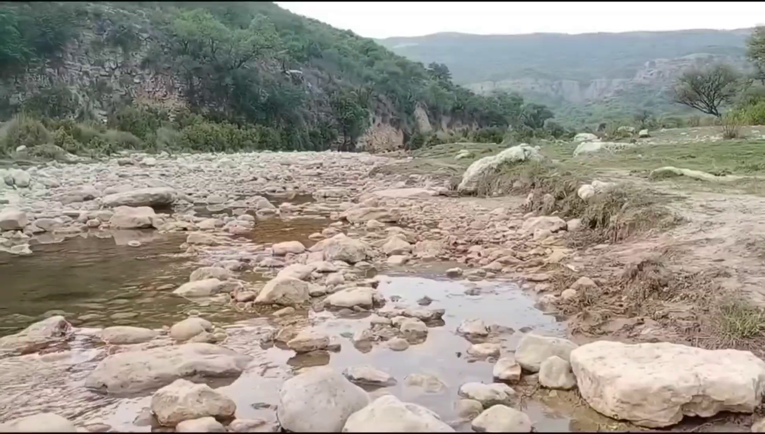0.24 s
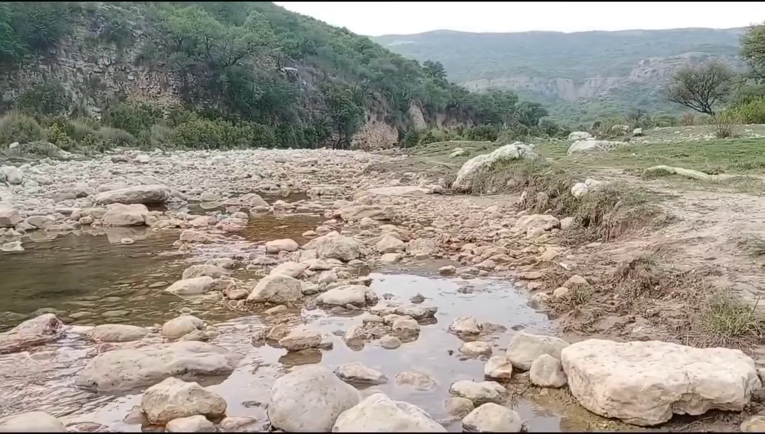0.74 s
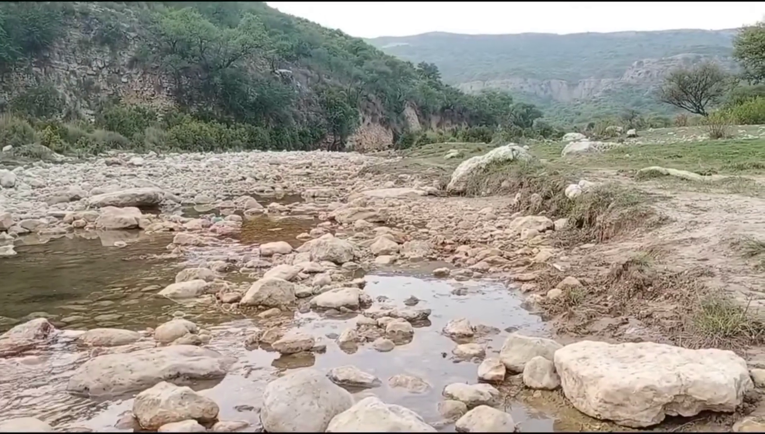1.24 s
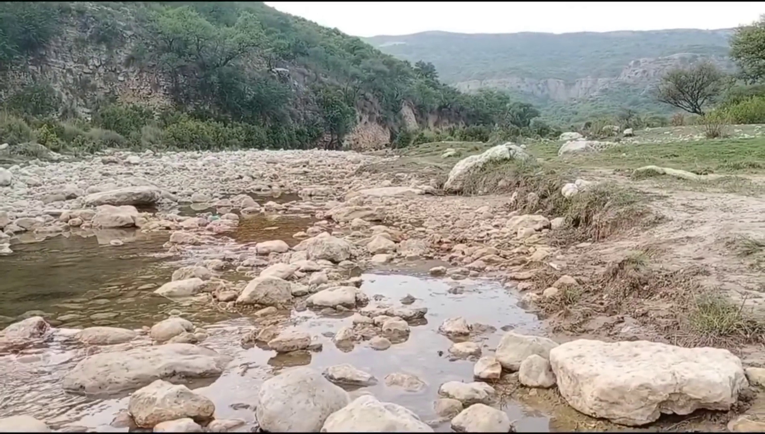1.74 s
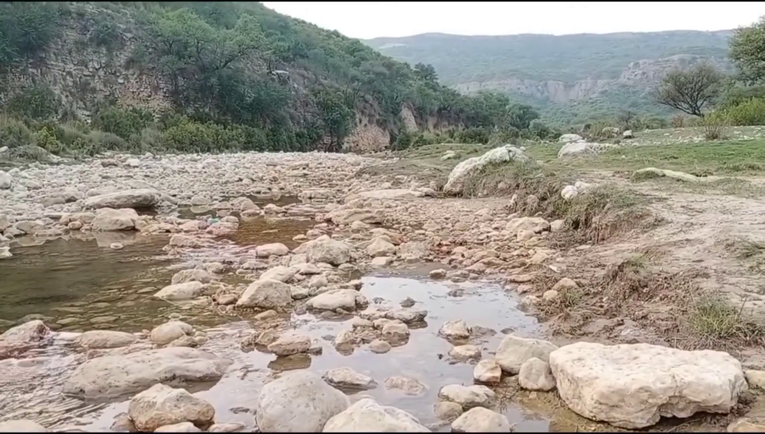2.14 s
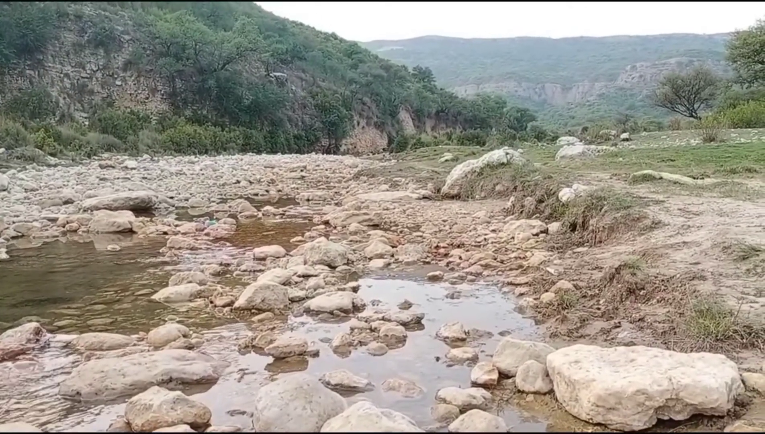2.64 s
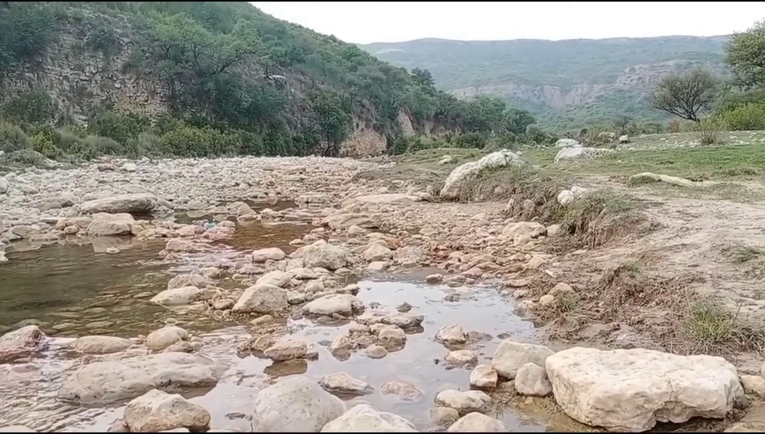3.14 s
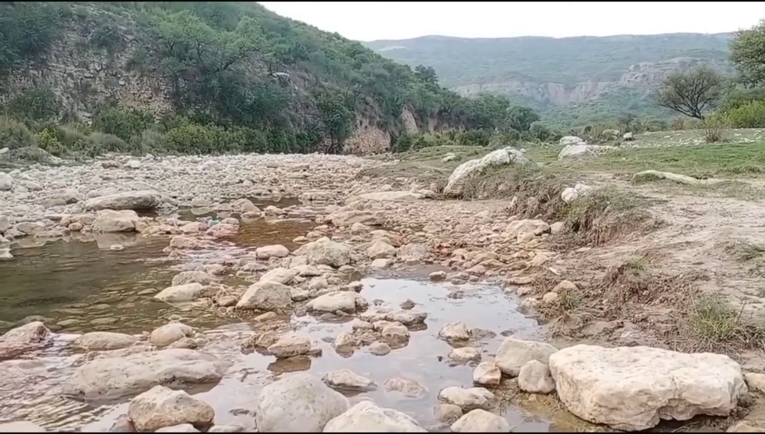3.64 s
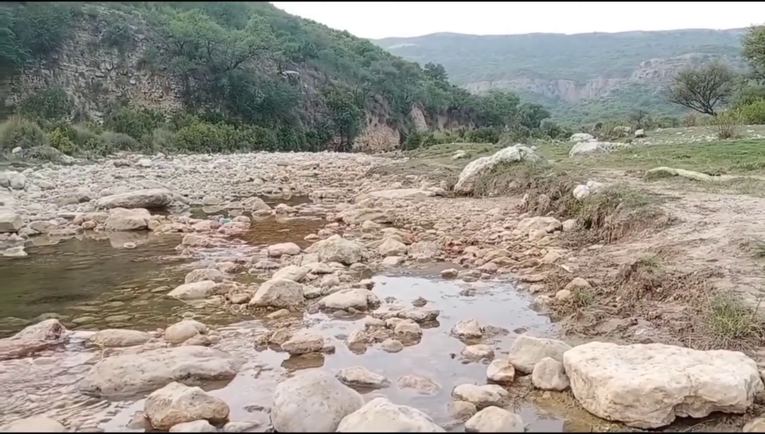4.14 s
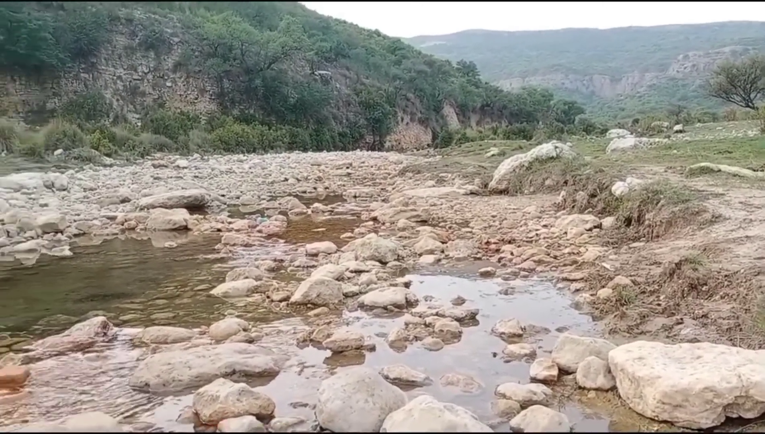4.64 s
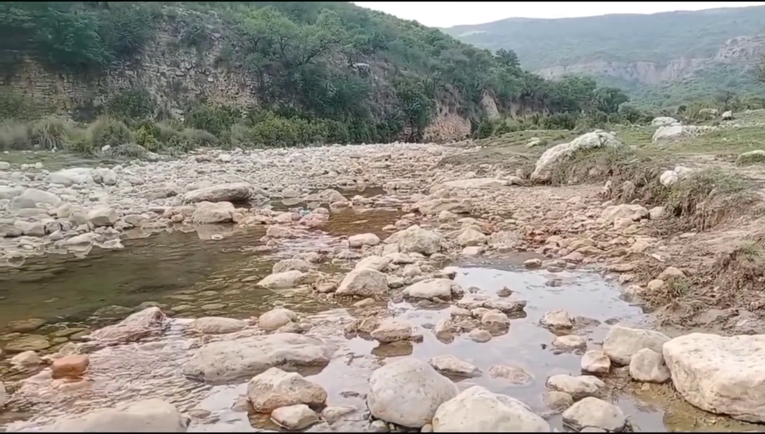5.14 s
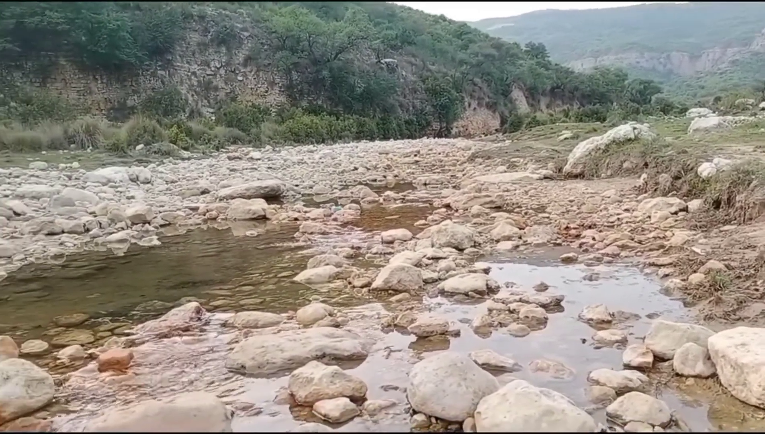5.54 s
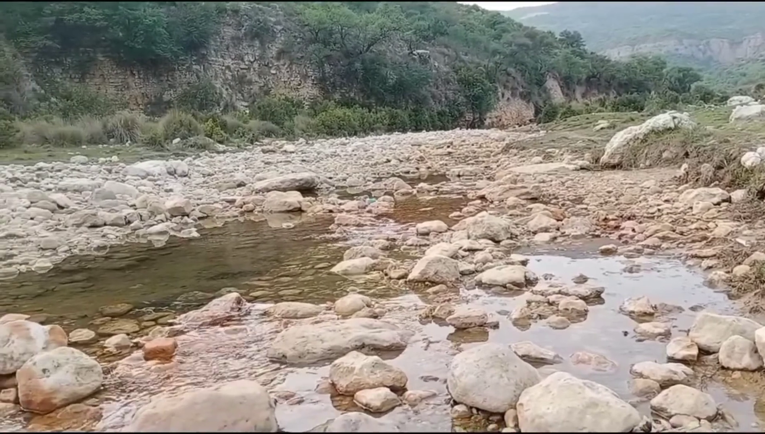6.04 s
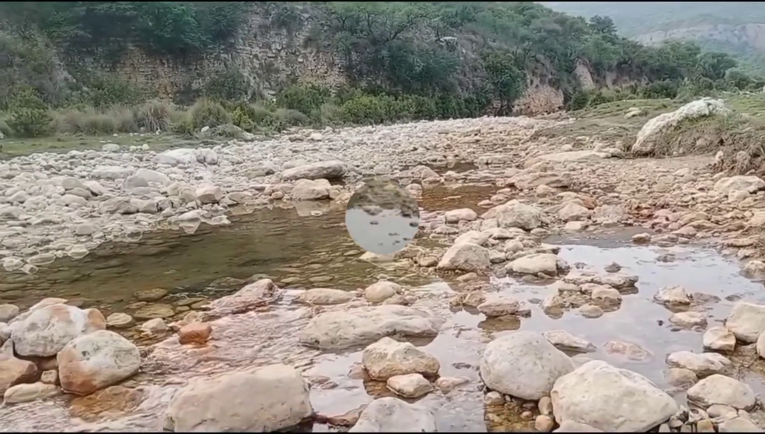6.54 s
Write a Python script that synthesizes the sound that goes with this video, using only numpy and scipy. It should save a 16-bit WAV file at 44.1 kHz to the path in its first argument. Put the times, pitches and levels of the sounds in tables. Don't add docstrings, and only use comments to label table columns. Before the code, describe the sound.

Quiet water bubbles and splashes among rocks while feet shift on gravel and birds chirp; at the end soft wind, hiss and engine puffs fade in.

```python
import sys
import numpy as np
from scipy import signal
from scipy.fft import rfft, irfft, next_fast_len
from scipy.io import wavfile
from scipy.ndimage import uniform_filter1d, map_coordinates

SR = 44100
rng = np.random.default_rng(int(sys.argv[2]) if len(sys.argv) > 2 else 0)


def pcm_store(signal):
    levels = np.round(np.clip(np.atleast_2d(signal), -1, 1) * 32767)
    wavfile.write(sys.argv[1], SR, levels.astype(np.int16).T)


def voltage_ratio(level):
    return 10 ** (np.asarray(level, float) / 20)


N = 298998
T = np.arange(N) / SR
CUT_S, TOP_HZ = 0.305, 15750

# time in seconds, level in dB.
CALM_FLOW = [(0, -51.5), (.087, -55), (.304, -50.5), (.307, -85), (.42, -67.5), (1.2, -59.5), (2.3, -56.5),
             (2.53, -68), (2.85, -64), (3.25, -68), (3.9, -63), (4.34, -65.5), (5.3, -63), (6.4, -56.5),
             (6.51, -65), (6.78, -51)]
# time in seconds, level in dB.
VALLEY_RUMBLE = [(0.0, -76.5), (0.136, -67), (0.304, -72.5), (0.307, -81), (1.23, -77.5), (5.28, -79),
                 (6.3, -73), (6.78, -64)]
# crest in seconds, seconds to fall 10 dB, crest in dB, fizz over it in dB.
SURGES = [(0.54, -0.05, -57, -4.5), (.91, 0.7, -61, -27), (1.2, 0.5, -67, -4), (1.4, 0.15, -58.5, -12),
          (1.591, 0.0738, -48.5, -7.5), (1.912, 0.13, -52, -3), (2.078, 0.11, -52, -2),
          (2.234, 0.08, -63, 6.5), (2.41, 0.09, -57, -7.5), (2.598, 0.13, -56, -5), (2.95, 0.32, -59, -7),
          (3.17, 0.05, -55.5, -1), (3.51, 0.24, -48, -3), (3.727, 0.21, -51, -23),
          (3.934, 0.11, -58.5, -2.5), (4.272, 0.06, -54.5, -21), (4.447, 0.4, -62, -14),
          (4.749, 0.13, -64, -1), (5.171, 1, -61, -14.5), (5.645, 0.28, -54.5, -9), (5.978, 0.27, -56, -7)]
# start in seconds, length in seconds, level in dB.
SCUFFS = [(0.615, 0.04, -85), (0.88, 0.06, -86), (1.298, 0.033, -76), (1.397, 0.055, -82.6),
          (1.497, 0.06, -77.5), (1.563, 0.071, -71.5), (1.645, 0.045, -83), (1.816, 0.071, -70.9),
          (1.905, 0.023, -65), (1.93, 0.061, -78), (2.015, 0.13, -63), (2.15, 0.2, -70.5), (2.41, 0.1, -76),
          (2.555, 0.068, -73), (2.672, 0.1, -71), (2.76, 0.25, -78), (3.165, 0.044, -81),
          (3.306, 0.051, -71.3), (3.367, 0.27, -62), (3.6, 0.17, -69), (3.8, 0.18, -72), (3.99, 0.1, -85),
          (4.25, 0.03, -81), (4.687, 0.045, -79), (4.74, 0.037, -80), (4.86, 0.037, -83),
          (5.196, 0.045, -78.5), (5.295, 0.057, -75), (5.443, 0.036, -80), (5.653, 0.034, -81),
          (5.867, 0.14, -77), (6.266, 0.054, -77), (6.46, 0.06, -83.1)]

# frequency in Hz, level in dB.
RUMBLE_COLOUR = [(15, -46.5), (40, -10.5), (75, 0), (110, -1), (250, -1.5), (565, -7), (1000, -5.5),
                 (1300, -20.5)]
GURGLE_COLOUR = [(700, -40.5), (1050, -17), (1400, -2.5), (2250, 2), (3200, -1), (4200, 0), (4900, -4),
                 (5200, -49.5)]
FIZZ_COLOUR = [(4900, -22.5), (5250, -4), (5840, 4.5), (6200, -3), (6520, -9.5), (6860, -6), (7290, -26.5),
               (7850, -18.5), (8300, -25.5), (9200, -56)]
GRIT_COLOUR = [(6500, -0.5), (7500, -5), (9300, -14.5), (11600, -9.5), (11950, -4), (14800, 0.5),
               (15650, -4), (15800, -54.5)]
WIND_COLOUR = [(5.9, -29), (10, 4), (221, -14.5), (305, -24.5), (2500, -36.5), (3250, -76), (5500, -120)]
HISS_COLOUR = [(1470, -39), (2500, -9), (3850, -12), (4170, -10), (8270, 1), (14000, -43)]

# frequency in Hz, width in Hz, level in dB.
POOLS = [(1180, 61, -32.5), (1380, 290, 2.5), (1970, 140, -5), (2167, 160, 3), (2920, 820, -2.5),
         (3300, 108, 5.5), (3706, 130, -7.5)]
# frequency in Hz, width in Hz, level in dB.
RIFFLES = [(4780, 110, -0.5), (6373, 326, 0.5), (7810, 230, -8)]
# frequency in Hz, width in Hz, level in dB.
PEBBLE = [(1376, 67, 1), (1770, 140, -4), (2440, 340, -6), (3680, 236, -2.5), (4580, 285, -9),
          (6000, 670, -10.5), (7270, 1500, -25.5)]
# frequency in Hz, width in Hz, level in dB.
PIPE = [(112, 55, -8), (220, 66, -1.5), (530, 160, -16), (780, 230, -16.5)]

# start in seconds, pitch in Hz, peak in dB.
BLOOPS = [(0.177, 1424, -35.5), (0.376, 1437, -60), (0.441, 1144, -65.5), (0.698, 1496, -46.5),
          (.792, 1180, -41), (0.898, 1500, -52.5), (1.075, 1590, -49), (1.611, 1428, -43.5),
          (1.708, 1500, -43.5), (2.587, 1600, -45.5), (2.932, 1380, -53.5), (3.333, 1545, -44),
          (3.664, 1293, -48), (3.744, 1157, -41.5), (3.757, 857, -49), (4.081, 1180, -43.5),
          (4.732, 1490, -44.5), (4.748, 805, -58), (4.888, 1520, -53.5), (5.265, 383, -51.5),
          (5.329, 872, -53), (5.654, 1415, -51), (6.121, 1357, -44), (6.121, 1113, -48.5),
          (6.188, 1630, -49), (6.235, 1170, -58), (6.389, 878, -59.5), (6.759, 1426, -41)]
# start in seconds, pitch in Hz, peak in dB.
PLINKS = [(.119, 2740, -36), (0.545, 1970, -55), (0.609, 3090, -57), (0.837, 2290, -51.5),
          (0.852, 2935, -47.5), (0.959, 3130, -53.5), (1.189, 2870, -52), (1.282, 3190, -51),
          (1.43, 2810, -50), (1.632, 2700, -50.5), (1.705, 2234, -43.5), (2.15, 2245, -44),
          (2.811, 2850, -47.5), (4.231, 2345, -54.5), (4.275, 3010, -54.5), (4.633, 2740, -42),
          (5.099, 4045, -49), (5.377, 1784, -51), (5.482, 1970, -50), (5.511, 1950, -52),
          (5.585, 3450, -52.5), (5.652, 3840, -53), (5.72, 2760, -47), (5.892, 2440, -50.5),
          (6.119, 2795, -22), (6.122, 2295, -45), (6.759, 2690, -43.5)]
# start in seconds, pitch in Hz, peak in dB, seconds to die by 60 dB.
GLUGS = [(.653, 1440, -59, 0.11), (.737, 3134, -55.5, 0.22), (1.439, 970, -60, 0.077),
         (1.525, 3060, -54.5, 0.23), (1.59, 2242, -52, 0.65), (1.66, 717, -60, 0.13),
         (1.902, 3250, -49.5, 0.2), (2.387, 1326, -51.5, 0.11), (2.665, 1930, -48.5, 0.14),
         (2.734, 2410, -42.5, 0.024), (1.225, 4780, -55.5, 0.12), (2.89, 2146, -58.5, 0.47),
         (3.065, 2270, -55.5, 0.25), (3.89, 3290, -56.5, 0.31), (6.29, 1180, -59.5, 0.09),
         (3.917, 1906, -55, 0.57), (4.012, 1770, -49.5, 0.081), (4.105, 3310, -52, 0.073),
         (4.894, 1054, -59.5, 0.089), (5.3, 697, -58.5, 0.14), (5.51, 1380, -51.5, 0.14),
         (5.62, 690, -63, 0.15), (5.74, 450, -53.5, 0.19), (5.981, 1240, -55.5, 0.18),
         (6.384, 1506, -51.5, 0.1)]
# start in seconds, pitch in Hz, peak in dB.
BLIPS = [(0.001, 2836, -47), (0.042, 1890, -46), (0.053, 996, -54), (0.202, 3560, -41), (0.21, 1905, -44.5),
         (0.506, 1970, -57.5), (0.546, 3080, -54.5), (0.747, 2300, -52.5), (1.283, 2820, -48),
         (1.378, 2290, -49), (1.494, 3800, -50.5), (1.532, 2330, -47), (1.588, 4130, -50),
         (1.845, 2540, -46.5), (2.331, 1970, -52), (2.415, 2270, -49), (2.6, 2520, -39),
         (2.701, 517, -37.5), (2.702, 3800, -32.5), (2.884, 3090, -46.5), (2.986, 1680, -51),
         (3.017, 3630, -53), (3.168, 2240, -50), (3.177, 4110, -51), (3.195, 2950, -51),
         (3.206, 2430, -52.5), (3.375, 2230, -47.5), (3.744, 4330, -44), (3.751, 2245, -40),
         (3.749, 2980, -39.5), (4.074, 2880, -47.5), (4.077, 1584, -42.5), (4.091, 3310, -46.5),
         (4.23, 3060, -50), (4.236, 2550, -49.5), (4.259, 2310, -50), (5.085, 3360, -48.5),
         (5.396, 3090, -50.5), (5.507, 1600, -50), (5.514, 622, -46.5), (5.546, 3330, -50.5),
         (5.624, 1380, -49), (5.654, 2740, -46), (5.757, 1580, -41), (5.905, 1680, -48.5),
         (6.23, 2030, -51), (6.315, 3380, -53.5), (6.405, 1270, -46), (6.414, 2020, -48.5),
         (6.692, 1875, -48)]
# start in seconds, pitch in Hz, peak in dB, length in seconds.
TRICKLES = [(0.858, 2230, -49, 0.018), (0.967, 2590, -52.5, 0.035), (1.207, 3060, -49.5, 0.03),
            (1.379, 922, -57, 0.024), (1.466, 2260, -54, 0.029), (1.497, 3150, -55.5, 0.04),
            (1.808, 2175, -48.5, 0.06), (1.876, 1945, -52.5, 0.049), (2.03, 2620, -50, 0.037),
            (2.08, 3750, -51, 0.02), (2.105, 1850, -54, 0.071), (2.193, 1890, -53, 0.013),
            (2.295, 3780, -55, 0.046), (2.356, 1870, -53.5, 0.096), (2.808, 2776, -59.5, 0.082),
            (2.909, 1890, -55, 0.068), (3.131, 1910, -52.5, 0.066), (3.181, 4110, -52.5, 0.032),
            (3.352, 1920, -50.5, 0.031), (3.393, 2310, -50.5, 0.036), (3.538, 2455, -51.5, 0.056),
            (3.623, 1644, -49, 0.036), (3.645, 2006, -50, 0.046), (3.894, 2530, -61, 0.041),
            (4.206, 1945, -55, 0.031), (4.925, 2770, -60, 0.04), (5.731, 3530, -55, 0.03)]
# start in seconds, pitch in Hz, peak in dB, length in seconds.
SLOSHES = [
    (0.378, 1097, -63.5, 0.018),
    (3.474, 1100, -56.5, 0.023),
    (5.109, 1067, -62, 0.024),
    (5.268, 612, -62, 0.035),
    (5.524, 975, -57.5, 0.027),
    (5.527, 680, -55.5, 0.026),
    (5.557, 440, -60, 0.033),
    (5.694, 448, -61, 0.026),
    (5.781, 722, -61, 0.03),
]
# start in seconds, peak in dB, pitch in Hz.
SPITS = [(0.178, -30.5, 6180), (0.5312, -47, 5850), (0.9058, -52, 6380), (1.535, -48, 6200),
         (1.5953, -52, 5750), (1.8043, -43.5, 5800), (2.1924, -52, 6900), (2.2293, -40.5, 5900),
         (2.4134, -45.5, 6160), (2.599, -30, 5660), (2.7417, -39, 5740), (2.868, -55, 6400),
         (3.638, -39, 5500), (4.1797, -49.5, 6480), (4.2626, -46, 5870), (4.7341, -43.5, 5990),
         (5.1667, -49.5, 6360), (5.3188, -49.5, 6280), (5.3423, -48, 6070), (5.5662, -50.5, 6300),
         (5.5877, -52, 5830), (5.654, -43.5, 5800), (5.884, -47.5, 5760), (5.9734, -44, 5920)]
# start in seconds, peak in dB.
DROPLETS = [(0.2786, -51.5), (0.299, -53), (1.49, -62.5), (1.91, -49), (2.044, -52.5), (2.7032, -52.5),
            (3.638, -55), (3.6802, -49.5), (3.743, -46.5), (4.749, -55.5), (4.762, -56.5), (6.467, -63.5)]

# start in seconds, pitch in Hz, peak in dB, rise in seconds,
# seconds to die by 60 dB.
KNOCKS = [(.1, 76.5, -53, 0.028, 1), (6.24, 162.4, -51.5, 0.023, 0.56), (6.37, 270, -48, 0.029, 0.074),
          (6.435, 290, -53.5, 0.021, .15), (2.603, 257.4, -40.5, 0.0019, 0.23),
          (2.703, 263, -39, 0.019, 0.2), (3.5, 263.5, -61, 0.047, 0.33), (3.572, 255.3, -51, 0.0068, 0.33),
          (3.744, 259, -42, 0.032, 0.15), (5.272, 183, -50.5, 0.02, 0.12),
          (5.333, 220, -42.5, 0.0011, 0.15), (5.513, 220, -39, 0.01, 0.081),
          (5.543, 235, -46.5, 0.007, 0.12), (5.57, 210.4, -53, 0.018, 0.33),
          (5.609, 228.4, -43.5, 0.016, 0.36), (5.693, 229.7, -43.5, 0.039, 0.3),
          (5.741, 244.8, -37.5, 0.018, 0.15), (5.81, 236, -52.5, 0.012, 0.085),
          (6.041, 260, -37, 0.028, 0.17), (6.045, 162, -50.5, 0.029, .1), (6.205, 260, -32.5, 0.016, 0.053),
          (6.766, 290, -35, 0.0034, 0.073)]
# start in seconds, peak in dB, thud against it in dB, seconds to die by 60 dB.
CLACKS = [(0.181, -20.5, -16, 0.022), (0.2117, -43, -45, 0.026), (1.948, -56.5, 2, 0.3),
          (2.6017, -28.5, -12.5, 0.047), (2.7004, -14.5, -20.5, 0.078), (2.7423, -33, -15, 0.11),
          (3.188, -48, -9, 0.064), (3.7432, -23, -17, 0.067), (3.754, -24, -8.5, 0.035),
          (4.08, -39.5, -48, 0.13), (5.258, -47.5, 2, 0.046), (5.512, -48.5, 1.5, 0.14),
          (5.7631, -47, 8, 0.093)]
# time in seconds, pitch in Hz, level in dB.
WHISTLES = [
    [(.14, 3830, -59), (.19, 3805, -45.5), (.213, 3760, -43.5), (.247, 3925, -47), (.298, 3904, -50.5),
     (.304, 4030, -41)],
    [(4.39, 4200, -69), (4.42, 4180, -68), (4.54, 3900, -75)],
    [(4.44, 2920, -63.5), (4.506, 2830, -64), (4.57, 2840, -78)],
    [(4.8, 3300, -88), (4.902, 3410, -54), (4.97, 3450, -71)],
    [(5.19, 2960, -79), (5.29, 2887, -55.5), (5.35, 2870, -70.5)],
]
# time in seconds, wind in dB, hiss in dB.
ROADSIDE_AIR = [
    (6.26, -77.5, -91),
    (6.476, -53.5, -74.5),
    (6.78, -53.5, -62),
]
# start in seconds, pitch in Hz, peak in dB, rise in seconds, seconds to die by 60 dB.
GUST = [
    (6.455, 10.6, -42.5, .11, .12),
]

WASH_DB = 3
FIZZ_CALM_DB, FIZZ_OPENING_DB = -17, 14.5
GRIT_CALM_DB, GRIT_OPENING_DB = -86, 14
GRIT_HUSH_DB, GRIT_HUSH_S = -6.5, 0.9
SETTLE_DB, SETTLE_S = -22.5, 0.085
SMOOTH_S, SMOOTH_SHARE = 4.2, 0.75
SURGE_RISE = 0.7
SCUFF_EDGE_S, SCUFF_ARCH_DB = 0.01, 2.5
LIFE_S, LIFE_BY_PITCH, LIFE_BY_LEVEL = 0.073, 0.47, 0.33
GLUG_RISE_S, BLIP_RISE_S, BLIP_T60_S, SPIT_T60_S = 0.012, 0.0032, 0.066, 0.02
TRICKLE_SWELL, TRICKLE_T60 = 0.41, 5.05
TRILL_S, CHIRP_GAP_S = 6.348, 0.0897
TRILL_DB, TRILL_ARCH_DB = -40.5, 0.9
FIRINGS, FIRST_FIRING_S, FIRING_GAP_S = 5, 6.504, 0.0555
FIRING_DB, NEARING_DB = -61, 1.9
NOTCH_HZ, NOTCH_WIDTH_HZ, NOTCH_DEPTH = 7280, 120, 0.53


def unit(x):
    return x / np.sqrt(np.mean(x ** 2) + 1e-20)


def white():
    return rng.standard_normal(N)


def curves(rows):
    s, *columns = np.transpose(rows)
    return [np.interp(T, s, column) for column in columns]


def filtered(x, response):
    m = next_fast_len(N + 8192)
    hz = np.fft.rfftfreq(m, 1 / SR)
    return irfft(rfft(x, m) * response(hz), m)[..., :N]


def coloured(x, points):
    f, db = np.transpose(points)
    return unit(filtered(x, lambda hz: voltage_ratio(np.interp(np.log(hz + 1), np.log(f), db, -120, -120))))


def resonant(x, modes):
    def response(f):
        total = 0
        for k, (centre, width, db) in enumerate(modes):
            total = total + (-1) ** k * voltage_ratio(db) * 1j * f * width / (centre ** 2 - f ** 2 + 1j * f * width)
        return total
    return filtered(x, response)


def streaky(depth_db, share=0.03, hold=0.9):
    z = signal.stft(rng.standard_normal(N + 1024), nperseg=384)[2]
    openings = (rng.random(z.shape) < share) * rng.exponential(size=z.shape)
    openings = uniform_filter1d(openings, size=2, axis=0) * 2
    closing = signal.lfilter([1], [1, -hold], openings, axis=1)
    field = np.tanh(0.84 * closing)
    return signal.istft(z * voltage_ratio(depth_db * unit(field - field.mean())), nperseg=384)[1][:N]


def wobble(rate):
    return map_coordinates(rng.standard_normal(int(N * rate / SR) + 4), [T * rate])


def rings(rows, glide, rough):
    s, hz, db, rise, t60 = np.transpose(rows)[..., None]
    t = np.arange(SR // 6) / SR
    rise = np.maximum(rise, 5e-4)
    swell = np.sin(np.pi / 2 * np.clip(t / rise, 0, 1)) ** 2
    shape = swell * voltage_ratio(-60 * np.maximum(t - rise, 0) / t60)
    walk = rough * np.cumsum(rng.standard_normal((len(s), len(t))), axis=1) * np.sqrt(hz / SR)
    walk = uniform_filter1d(walk, size=40, axis=1)
    tone = np.sin(2 * np.pi * hz * t * (1 + glide * t / (rise + t60)) + walk)
    at = (s * SR).astype(int) + np.arange(len(t))
    return np.bincount(at.ravel(), (voltage_ratio(db) * shape * tone).ravel(), N + SR)[:N]


def swarm(count, lo_hz, hi_hz, cycles, spread_db):
    u = rng.random((count, 4))
    hz = lo_hz * (hi_hz / lo_hz) ** u[:, 1]
    life = cycles * (0.5 + u[:, 3]) / hz
    db = -spread_db * np.log(u[:, 2])
    return unit(rings(np.c_[u[:, 0] * N / SR, hz, db, life / 3, life], glide=0.04, rough=0.2))


def crests(calm_db, s, fall, db, rise):
    coarse = T[::SR // 1000]
    late = (coarse - s[:, None]) / np.maximum(np.abs(fall), 1 / 50)[:, None]
    peaks = voltage_ratio(2 * db[:, None] - 20 * np.maximum(late, -late / rise)).sum(axis=0)
    return 10 * np.log10(voltage_ratio(2 * calm_db) + np.interp(T, coarse, peaks))


def scuffs(calm_db):
    coarse = T[::SR // 1000]
    s, length, db = np.transpose(SCUFFS)[..., None]
    off = np.abs(coarse - s - length / 2)
    arch = SCUFF_ARCH_DB * np.minimum(2 * off / length, 1) ** 2
    edge = 10 * np.maximum(off - length / 2, 0) / SCUFF_EDGE_S
    power = voltage_ratio(2 * (db - arch - edge)).sum(axis=0)
    return 10 * np.log10(voltage_ratio(2 * calm_db) + np.interp(T, coarse, power))


def motion():
    calm_db, = curves(CALM_FLOW)
    s, fall, db, fizz_db = np.transpose(SURGES)
    near = T < CUT_S
    gurgle = crests(calm_db, s, fall, db, SURGE_RISE)
    fizz_calm = calm_db + FIZZ_CALM_DB + FIZZ_OPENING_DB * near
    fizz = crests(fizz_calm, s, fall, db + fizz_db, SURGE_RISE)
    hush = GRIT_HUSH_DB * np.exp(-T / GRIT_HUSH_S + 0.5)
    grit = scuffs(GRIT_CALM_DB + np.where(near, GRIT_OPENING_DB, hush))
    return gurgle, fizz, grit


def gurgling():
    small = swarm(count=1100, lo_hz=1151, hi_hz=4896, cycles=166.6, spread_db=2)
    trickle = unit(streaky(depth_db=10, share=0.04)) + 0.5 * small
    eased = SMOOTH_SHARE * np.clip(4 * (T - SMOOTH_S), 0, 1)
    even = unit(voltage_ratio(2.4 * wobble(150)) * white())
    trickle = np.sqrt(1 - eased) * trickle + np.sqrt(eased) * even
    return coloured(0.36 * trickle + resonant(trickle, POOLS), GURGLE_COLOUR)


def far_riffles():
    rough_water = streaky(depth_db=6, share=0.11, hold=0.87) * voltage_ratio(4 * wobble(70))
    return unit(resonant(resonant(rough_water, RIFFLES), RIFFLES))


def bubbles():
    s, hz, db = np.transpose(BLOOPS + PLINKS)
    t60 = LIFE_S * (1000 / hz) ** LIFE_BY_PITCH * voltage_ratio(-LIFE_BY_LEVEL * (db + 59.0))
    pips = rings(np.c_[s, hz, db, 0.15 * t60, t60], glide=-0.014, rough=0.2)
    glugs = rings(np.insert(GLUGS, 3, GLUG_RISE_S, axis=1), glide=0.0175, rough=0.43)
    return voltage_ratio(5.5) * pips + voltage_ratio(3.5) * glugs


def stream():
    gurgle_db, fizz_db, grit_db = motion()
    rumble_db, = curves(VALLEY_RUMBLE)
    surge = wobble(25)
    since_cut = np.abs(T - CUT_S)
    after = T > CUT_S
    fizz = coloured(streaky(depth_db=4.5, share=0.04, hold=0.88) * voltage_ratio(1.2 * wobble(120)), FIZZ_COLOUR)
    grit = coloured(streaky(depth_db=1.5) * voltage_ratio(2 * wobble(350)), GRIT_COLOUR)
    rush = voltage_ratio(gurgle_db - 3 + 1.9 * surge) * gurgling()
    rush += voltage_ratio(1.293 * fizz_db + 15.0 + 0.44 * surge) * fizz
    rush += voltage_ratio(grit_db + 1.6 * wobble(40) - 5.8 * (T > 6.53)) * grit
    rush += voltage_ratio(rumble_db) * coloured(streaky(depth_db=3.5), RUMBLE_COLOUR)
    rush += voltage_ratio(0.56 * fizz_db - 32.5 - 14 * after * np.exp(-since_cut / 0.45)) * far_riffles()
    valley = coloured(white(), GURGLE_COLOUR[:-1] + [(7000, -34.5)])
    rush += voltage_ratio(np.minimum(gurgle_db - 16.5, -72)) * valley
    rush += voltage_ratio(grit_db + WASH_DB) * coloured(white(), GURGLE_COLOUR)
    rush *= voltage_ratio(SETTLE_DB * after * np.exp(-since_cut / SETTLE_S))
    return rush + bubbles()


def specks():
    s, hz, db = np.transpose(BLIPS)
    blips = rings(np.c_[s, hz, db, 0 * s + BLIP_RISE_S, 0 * s + BLIP_T60_S], glide=0.022, rough=0.44)
    s, hz, db, length = np.transpose(TRICKLES + SLOSHES)
    threads = rings(np.c_[s, hz, db, TRICKLE_SWELL * length, TRICKLE_T60 * length], glide=0.019, rough=0.42)
    s, db, hz = np.transpose(SPITS)
    spits = rings(np.c_[s, hz, db - 4, 0 * s + 0.0015, 0 * s + SPIT_T60_S], glide=0.013, rough=0.71)
    fine = [(s, 8100, -63, 0, SPIT_T60_S) for s in (4.409, 4.493, 4.724)]
    return blips + threads + spits + rings(fine, glide=0.012, rough=0.47)


def stones():
    crack, thud = np.zeros(N + SR), np.zeros(N + SR)
    t = np.arange(SR // 8) / SR
    for s, db, thud_db, t60 in CLACKS:
        burst = (1 - np.exp(-t / 0.0012)) * voltage_ratio(-60 * t / t60) * rng.standard_normal((2, len(t)))
        crack[round(s * SR):][:len(t)] += voltage_ratio(db + 4.5) * burst[0]
        thud[round(s * SR):][:len(t)] += voltage_ratio(db + thud_db + 8.5) * burst[1]
    dull = resonant(thud[:N], [(203, 35, 2.5), (457, 102, 5.5), (740, 160, 1.5), (1100, 50, -2.0)])
    low = dull + voltage_ratio(0.5) * rings(KNOCKS, glide=0.0062, rough=0.36)
    low = filtered(low, lambda hz: hz ** 2 / (hz ** 2 + 70 ** 2))
    return resonant(crack[:N], PEBBLE) + low


def birds():
    song = np.zeros(N)
    for rows in WHISTLES:
        hz, db = curves(rows)
        on = (T > rows[0][0]) & (T < rows[-1][0])
        level = np.sqrt(2) * voltage_ratio(db + 4 * wobble(90))
        song += on * level * np.sin(2 * np.pi * np.cumsum(hz + 15 * wobble(60)) / SR)
    t = np.arange(SR // 28) / SR
    chirp = np.sin(np.pi * t / t[-1]) ** 1.4 * np.sin(2 * np.pi * (2900 * t - 3600 * t * t))
    beats = np.zeros(N)
    for k in range(5):
        s = TRILL_S + k * CHIRP_GAP_S
        db = TRILL_DB - TRILL_ARCH_DB * (k - 2) ** 2
        beats[round((s - 0.012) * SR)] = voltage_ratio(db - 2.5)
        late = round((s + 0.0027) * SR)
        beats[late:late + len(t)] = voltage_ratio(db - 41.5 - 60 * t / 0.12) * rng.standard_normal(len(t))
    return song + signal.fftconvolve(beats, chirp)[:N]


def droplets():
    snap, t = np.zeros(N + SR), np.arange(SR // 100) / SR
    for s, db in DROPLETS:
        snap[round(s * SR):][:len(t)] += voltage_ratio(db - 60 * t / 0.012) * rng.standard_normal(len(t))
    return resonant(snap[:N], [(6100, 1800, 5.3), (14000, 1900, 7.9)])


def motorcycle():
    puffs, t = np.zeros((2, N + SR)), np.arange(SR // 16) / SR
    breaths = []
    for k in range(FIRINGS):
        s, db = FIRST_FIRING_S + k * FIRING_GAP_S, FIRING_DB + k * NEARING_DB
        noise = rng.standard_normal((2, len(t)))
        noise[0, 0] = 40
        both = noise[0] + 0.36 * noise * [[0], [1]]
        puffs[:, round(s * SR):][:, :len(t)] += voltage_ratio(db + 22.5 - 60 * t / 0.2) * both
        breaths.append((s + 0.012, 130, db + 4.5, 0.012, 0.07))
    engine = filtered(resonant(puffs[:, :N], PIPE), lambda hz: 1 / (1 + 1j * hz / 1500) ** 2)
    engine += rings(breaths, glide=-0.068, rough=0.18)
    return engine * voltage_ratio([[1.5], [-1.5]])


def roadside():
    wind_db, hiss_db = curves(ROADSIDE_AIR)
    fade = np.clip((T - 6.26) / 0.09, 0, 1)
    wind = np.array([coloured(streaky(depth_db=2.5), WIND_COLOUR) for port in "LR"]) * voltage_ratio([[1], [-6]])
    hiss = np.array([coloured(white(), HISS_COLOUR) for port in "LR"])
    gust = rings(GUST, glide=0, rough=0) * [[1], [0]]
    return motorcycle() + gust + fade * (voltage_ratio(wind_db) * wind + voltage_ratio(hiss_db) * hiss)


def scene():
    return stream() + specks() + stones() + birds() + droplets() + roadside()


def roll_off(x):
    return signal.sosfilt(signal.butter(12, 16130, fs=SR, output="sos"), x)


def record(dry):
    def port(hz):
        dip = NOTCH_DEPTH / (1 + ((hz - NOTCH_HZ) / NOTCH_WIDTH_HZ) ** 2)
        return (hz < TOP_HZ) * (1 - dip)
    return roll_off(filtered(dry, port))


dry = scene()
out = record(dry)
pcm_store(out)
```